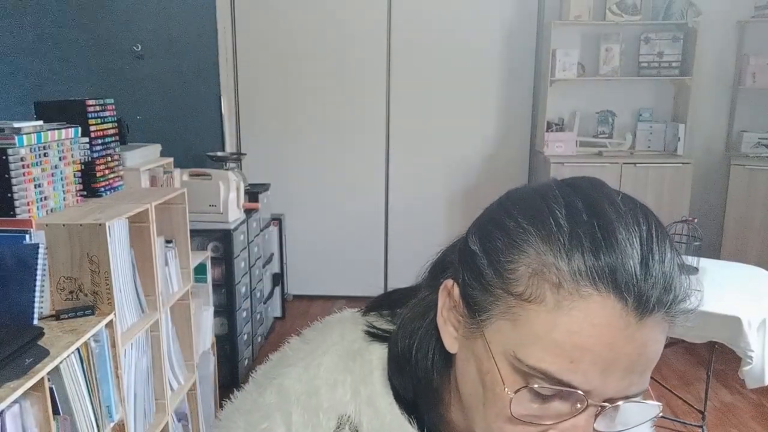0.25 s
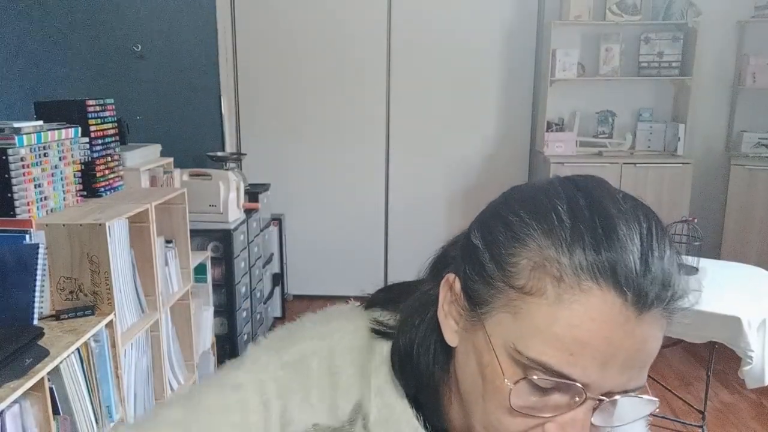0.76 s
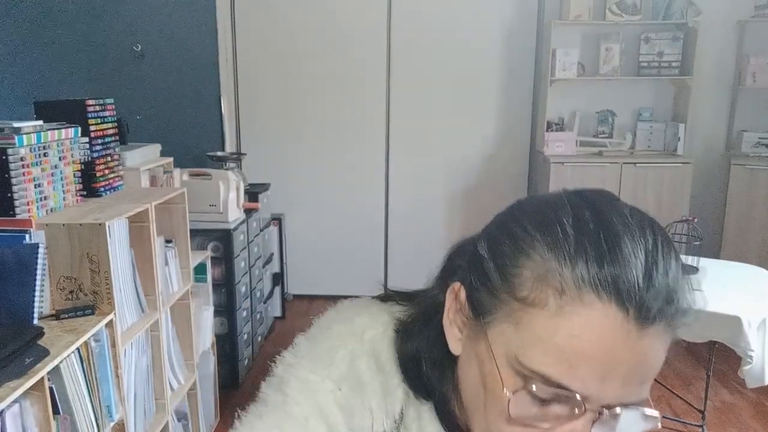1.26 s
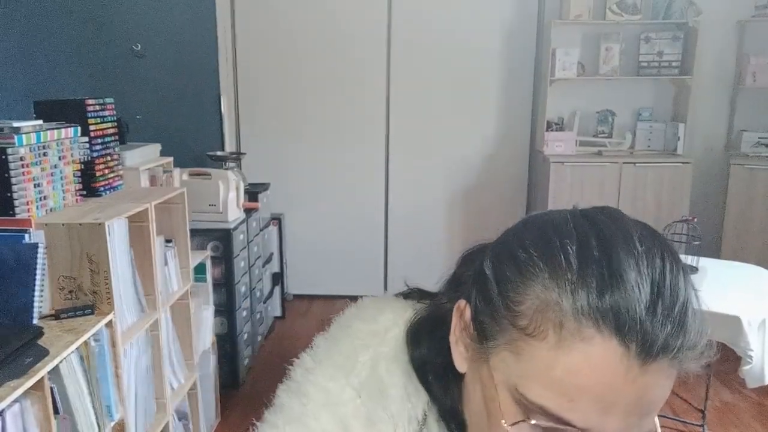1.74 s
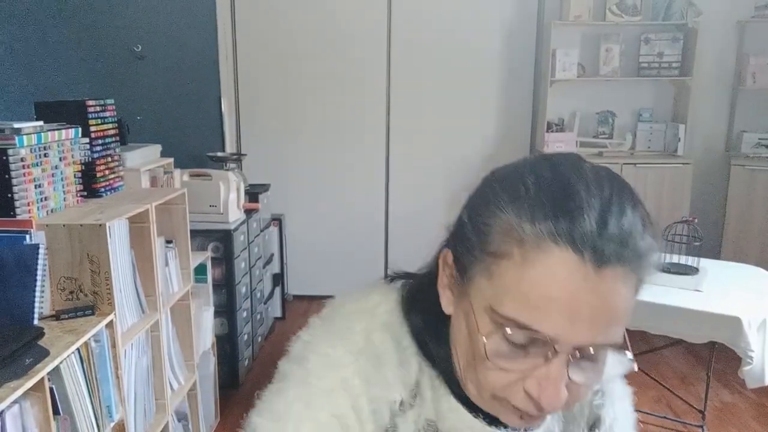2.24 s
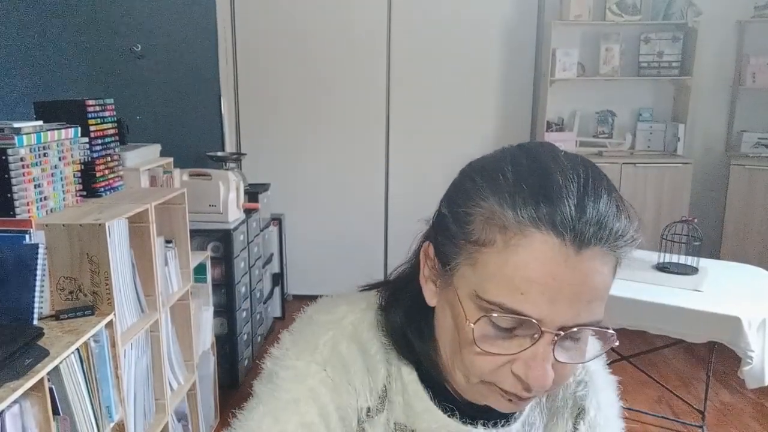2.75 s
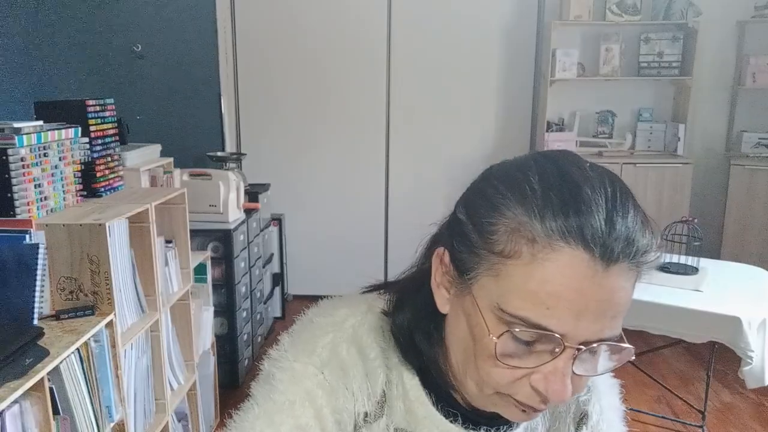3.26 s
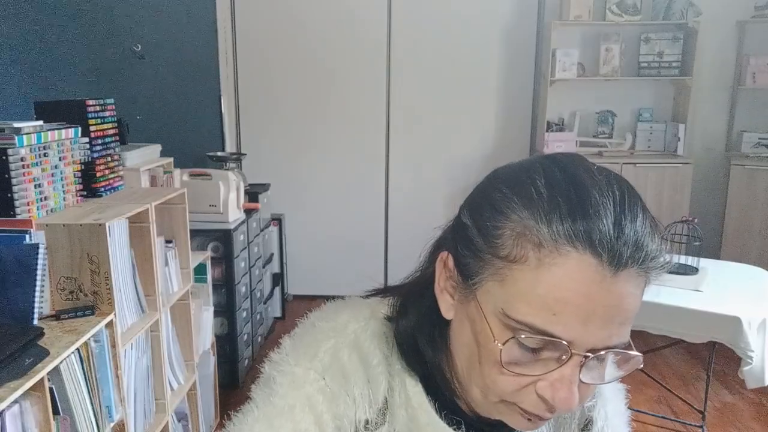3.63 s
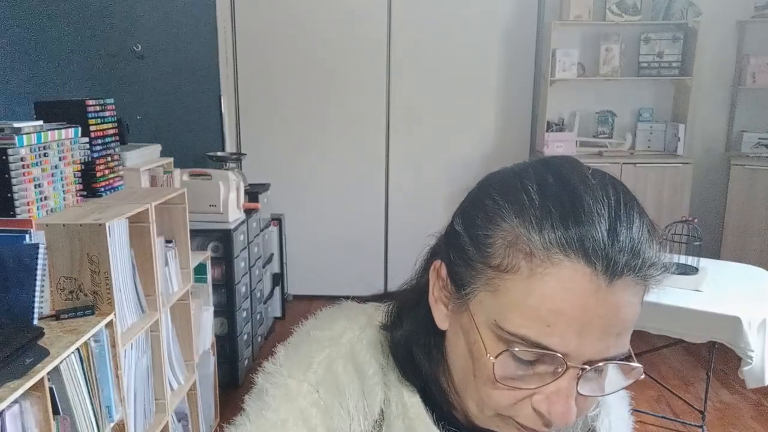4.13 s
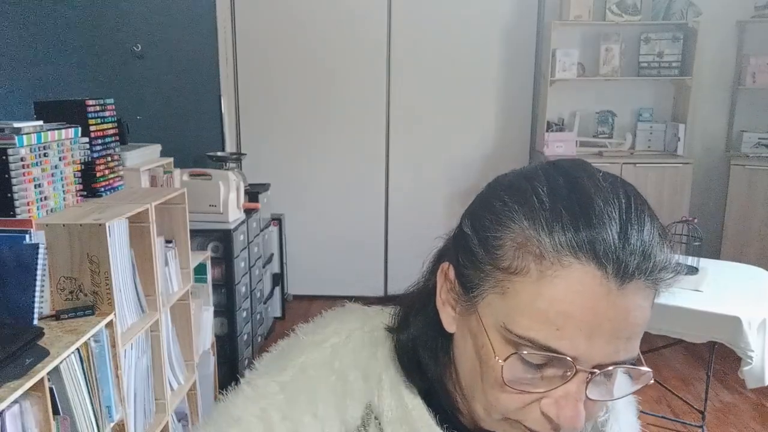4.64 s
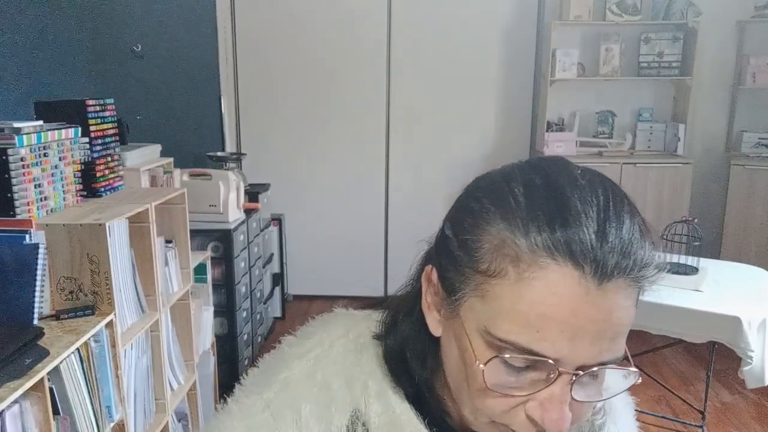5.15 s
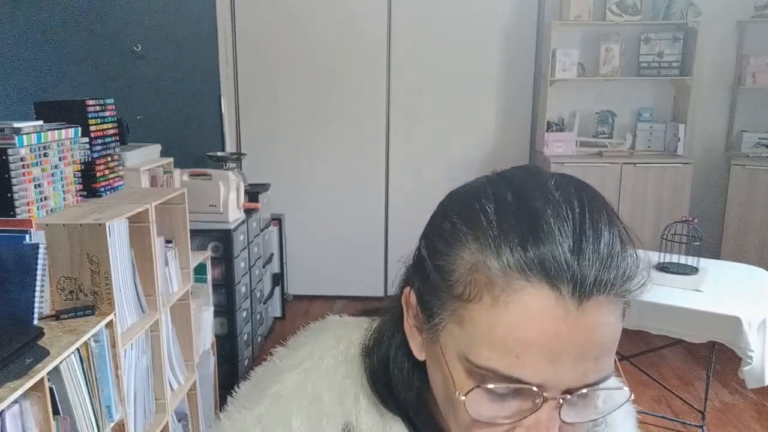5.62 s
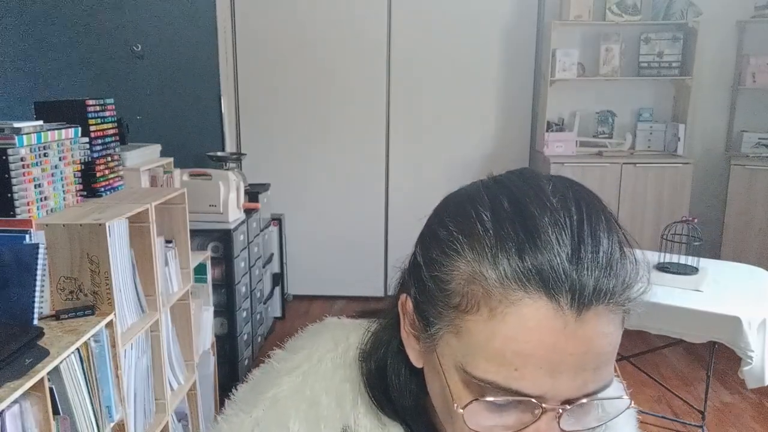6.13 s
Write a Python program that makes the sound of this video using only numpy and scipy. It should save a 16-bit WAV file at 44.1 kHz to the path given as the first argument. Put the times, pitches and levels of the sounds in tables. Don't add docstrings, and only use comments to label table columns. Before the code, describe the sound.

A hand punch ticks lightly into place, clacks and snaps hard through card, springs back with a clunk, then card rustles quietly on a table.

```python
import sys
import numpy as np
from scipy import signal
from scipy.fft import rfft, irfft
from scipy.io import wavfile
from scipy.ndimage import uniform_filter1d

SR = 44100
rng = np.random.default_rng(int(sys.argv[2]) if len(sys.argv) > 2 else 0)


def int16_out(signal):
    q = np.round(np.clip(np.atleast_2d(signal).T, -1, 1) * 32767)
    wavfile.write(sys.argv[1], SR, q.astype(np.int16))


def gain_from_decibels(decibels):
    exponent = np.asarray(decibels, float) / 20
    return 10 ** exponent


N = 281358

# frequency in Hz, level in dB, t60 in seconds.
TABLE_MODES = [(66, -5, 0.14), (100.4, 5, .35), (142.3, 0.5, 0.22), (166.1, 0, .3), (208.7, -1.5, 0.28),
               (245.7, 6.5, 0.15), (271.2, 0.5, .25), (319.8, -2, .2), (403, -8, .2), (495, -8, .2),
               (558, -14.5, 0.37), (619, -12, .12), (688, -11.5, .15), (840, -18.5, 0.23)]


def band(x, hz, width_hz):
    return signal.lfilter(*signal.iirpeak(hz, hz / width_hz, fs=SR), x)


def between(x, lo_hz, hi_hz):
    sos = signal.butter(2, [lo_hz, hi_hz], "band", fs=SR, output="sos")
    y = signal.sosfilt(sos, x)
    return y / np.std(y)


def walk(rate_hz):
    hold = int(SR / rate_hz)
    steps = np.repeat(rng.standard_normal(N // hold + 1), hold)
    return uniform_filter1d(steps, hold)[:N]


def pair(size, alike):
    mid, side = rng.standard_normal((2, size))
    same = 0.5 * min(alike, 1) / (1 + (np.fft.rfftfreq(size, 1 / SR) / 456) ** 2)
    mid = irfft(rfft(mid) * np.sqrt(0.5 + same), size)
    side = irfft(rfft(side) * np.sqrt(0.5 - same), size)
    return np.array([mid + side, mid - side])


def decay(t, t60_s):
    return np.exp(-np.log(1000) * t / t60_s)


def ring(modes, near_hz, focus_db, scatter_db):
    t = np.arange(SR // 2) / SR
    hz, db, t60_s = np.transpose(modes)[:, :, None]
    db = db - focus_db * np.abs(np.log2(hz / near_hz)) + scatter_db[:len(modes), None]
    y = np.sum(gain_from_decibels(db) * np.sin(2 * np.pi * hz * t) * decay(t, t60_s), axis=0)
    return y / np.max(np.abs(y))


def hum():
    # frequency in Hz, density in dB per Hz.
    hum_spectrum = [(15, -75.5), (25, -38), (53, -20.5), (124, 1), (207, -4), (279, -14.5), (303, -9),
                    (347, -14), (946, -41), (1140, -34.5), (2450, -30.5), (2800, -38), (3040, -33.5),
                    (14600, -40.5), (16300, -56.5)]
    hz, db = np.transpose(hum_spectrum)
    f = np.fft.rfftfreq(N, 1 / SR)
    shaped = rfft(pair(N, 0.71)) * gain_from_decibels(np.interp(np.log(f + 1), np.log(hz), db))
    low = irfft(shaped * (f < 450), N)
    high = irfft(shaped * (f >= 450), N)
    return (low * gain_from_decibels(1.4 * walk(14)) + high) * gain_from_decibels(-65) / np.std(low + high)


def room(left, right, spread):
    # band centre in Hz, t60 in seconds, wet level in dB.
    room_bands = [(148.3, .45, 4), (484, 0.48, 5), (1620, 0.46, 2), (4000, 0.46, 4), (8330, 0.33, 0.5)]
    t = np.arange(int(0.7 * SR)) / SR
    tail, noise = 0, pair(len(t), 0.98)
    for hz, t60_s, db in room_bands:
        part = between(noise, hz / 1.8, min(hz * 1.75, 0.45 * SR)) * decay(t, t60_s)
        tail = tail + gain_from_decibels(db) * part * np.sqrt(hz / (t60_s * SR * SR) * 30)
    tail = tail * np.clip((t - 0.003) / 0.003, 0, 1)
    direct = np.array([left, np.roll(right, 2)])
    return direct + signal.fftconvolve(spread[None], tail, axes=1)[:, :N]


def microphone(x):
    x = x + (gain_from_decibels(11) - 1) * band(x, 9600, 2440)
    return signal.sosfilt(signal.butter(2, [55.6, 13340], "band", fs=SR, output="sos"), x)


def card():
    # time in seconds, hiss, scrape, drag and table rumble levels in dB.
    slides = [
        [(0.0, -88, -94, -92, -71), (0.076, -83, -90, -82, -73), (0.236, -79, -90, -97, -69),
         (0.276, -72, -76, -83, -82), (0.31, -62, -67.5, -85, -71), (0.364, -67, -67, -81, -80),
         (0.416, -55, -64, -77, -72), (0.426, -50, -64, -70, -64), (0.45, -64, -62, -76, -70.5),
         (0.49, -59, -71, -81, -68), (0.508, -64, -69, -96, -77), (0.514, -58, -60, -90, -77),
         (0.524, -66, -67, -87, -74), (0.638, -87, -87, -90, -72.5), (1.028, -83, -95, -93, -75.5),
         (1.078, -88, -96, -93, -76), (1.102, -78, -96, -83, -65), (1.2, -85, -66, -77, -77)],
        [(1.31, -71, -65, -66, -55), (1.342, -64.5, -64.5, -69, -58), (1.418, -75, -77, -77, -68),
         (1.432, -64, -59, -77, -60), (1.47, -64, -73.5, -82, -64)],
        [(1.6, -67.5, -71, -69, -52), (1.632, -65.5, -68, -77, -55.5), (1.678, -56, -64, -71, -58),
         (1.688, -63, -65.5, -66, -67), (1.7, -54, -68, -76, -50.5)],
        [(2.0, -85, -82.5, -72, -58), (2.182, -90, -102, -82, -72), (2.22, -85, -93, -72, -64),
         (2.234, -66, -74, -77, -54), (2.26, -85, -70, -74, -59.5), (2.294, -50, -55.5, -79, -54),
         (2.33, -62, -51.5, -71, -53.5)],
        [(2.54, -72, -65, -74, -57), (2.62, -70, -69.5, -93, -69.5), (2.638, -69, -62.5, -67.5, -57.5),
         (2.714, -67, -64.5, -95, -63.5), (2.756, -65, -65, -75, -69), (2.838, -64, -62.5, -64, -54),
         (2.932, -82, -75, -82, -77), (2.948, -86, -85, -66, -65), (2.97, -84, -72, -75, -59.5)],
        [(3.03, -85, -79, -87, -66), (3.128, -91, -96, -83, -68.5), (3.168, -73, -70, -90, -64),
         (3.25, -77, -73, -77, -73), (3.354, -54.5, -58, -79, -64), (3.364, -59, -55.5, -77, -56.5),
         (3.428, -74, -74, -92, -68.5), (3.572, -76, -76, -82, -76), (3.582, -68, -71.5, -73, -67),
         (3.63, -78, -88, -93, -72), (3.66, -81, -74, -80, -72), (3.7, -98, -97, -86, -73.5),
         (4.044, -96.5, -102, -91.5, -76.5), (4.074, -82, -96, -83, -63), (4.094, -71, -75.5, -91, -76.5),
         (4.104, -72, -65.5, -72, -81), (4.134, -84, -84, -87, -61), (4.202, -73, -77, -87, -89),
         (4.228, -88, -99, -99, -72.5), (4.282, -74, -72, -84, -74), (4.316, -94, -98, -91, -73.5),
         (4.612, -79, -72, -85, -68.5), (4.67, -86, -86, -58, -64), (4.7, -87, -74, -72, -77),
         (4.8, -109, -94, -81, -67)],
        [(4.84, -63, -81, -85, -68), (4.912, -74, -71, -96, -70.5), (5.002, -82, -82, -82, -73.5),
         (5.074, -63.5, -68, -90, -75), (5.092, -74, -78, -83, -72), (5.152, -68, -69, -90, -73),
         (5.204, -80, -79, -82, -76.5), (5.26, -82, -82, -94, -78), (5.286, -68.5, -70.5, -85, -76.5),
         (5.37, -85, -77, -95, -72.5), (5.542, -69.5, -67.5, -90, -70), (5.568, -72, -66, -76, -78),
         (5.672, -83, -79, -91, -67.5), (5.736, -83, -72.5, -65.5, -69), (5.946, -80, -79.5, -85, -73.5),
         (6.018, -79, -73, -91, -72), (6.058, -90.5, -76.5, -97, -73.5), (6.144, -65, -65.5, -74, -74),
         (6.212, -89, -81, -84, -75), (6.314, -83, -73.5, -97, -71.5), (6.354, -91, -92, -84, -72),
         (6.38, -87, -95, -85, -70.5)],
    ]
    # frequency in Hz, width in Hz, level in dB.
    scrape_modes = [(1730, 230, -11), (2200, 320, 8), (2540, 2800, 1.5), (4200, 1500, -11)]
    rows = []
    for span in slides:
        before, after = span[0][0] - 0.02, span[-1][0] + 0.02
        rows += [[before] + 4 * [-100], *span, [after] + 4 * [-100]]
    s, *columns = np.transpose(rows)
    hiss_db, scrape_db, drag_db, rumble_db = (np.interp(np.arange(N) / SR, s, c) for c in columns)

    slip = pair(N, 0.9) * gain_from_decibels(1.2 * walk(40) + 2.2 * walk(400))
    scrape = sum(gain_from_decibels(db) * band(slip, hz, width_hz) for hz, width_hz, db in scrape_modes)
    shake = pair(N, 0.9) * gain_from_decibels(3 * walk(25))
    rumble = sum(gain_from_decibels(db) * band(shake, hz, 12 / t60_s) for hz, db, t60_s in TABLE_MODES)

    out = gain_from_decibels(hiss_db - 8.5) * between(slip, 5500, 15000)
    out = out + gain_from_decibels(scrape_db) * scrape / np.std(scrape)
    out = out + gain_from_decibels(drag_db) * between(slip, 450, 1740)
    return out + gain_from_decibels(rumble_db) * rumble / np.std(rumble)


def thump(db, hz):
    push = signal.windows.hann(int(0.0012 * SR))
    modes = ring(TABLE_MODES, hz, 4.4, 3 * rng.standard_normal(16))
    return -gain_from_decibels(db) * signal.fftconvolve(modes, push / push.sum())[:SR // 2]


def crack(db, hz, edge_db, chatter_ms, wall_db):
    # frequency in Hz, level in dB, t60 in seconds.
    punch_modes = [(1060, 2, 0.026), (1132, 6, 0.1), (1360, -15, 0.035), (1630, 6, 0.03), (1786, 1.5, 0.1),
                   (2110, 17.5, 0.022), (2300, 14, .05), (3340, 4, 0.018), (4820, 0, 0.025),
                   (5900, -3.5, 0.017)]
    t = np.arange(SR // 2) / SR
    fade = np.exp(-t / np.clip(chatter_ms / 1000, 0.0003, 0.008))
    mid, side = rng.standard_normal((2, len(t))) * fade
    walls = (t == 0) * np.sqrt(np.sum(mid ** 2)) * gain_from_decibels(wall_db)
    blow = np.array([mid + 0.47 * side, mid - 0.53 * side, walls])

    bare = band(band(blow, hz, 1.8 * hz), hz, 1.8 * hz)
    body = ring(punch_modes, hz, 16, 1.3 * rng.standard_normal(16))
    frame = signal.fftconvolve(blow[:, :SR // 20], body[None], axes=1)[:, :len(t)]
    edge = band(blow, 6130, 7000)

    out = 1.15 * bare / np.ptp(bare[0]) + 0.39 * frame / np.ptp(frame[0])
    return gain_from_decibels(db) * (out + 1.45 * gain_from_decibels(edge_db) * edge / np.ptp(edge[0]))


def place(rows):
    out = np.zeros((3, N + SR))
    for s, sound in rows:
        start = int(s * SR)
        out[:, start:start + SR // 2] += sound
    return out[:, :N]


def contacts():
    # start in seconds, crack peak in dB, body ring in Hz, edge minus crack in dB,
    # chatter in ms, share thrown to the walls in dB.
    hits = [(0.42, -46.5, 4630, -2, 2, 4), (0.425, -56, 2170, -5, 2.2, -1.5),
            (0.512, -51, 2240, -5, 1.74, -10), (1.115, -61, 1940, -11, 2.2, 2),
            (1.152, -54, 1780, -18, 2.2, -1.5), (1.185, -61, 1660, 3, 2.2, 4),
            (1.22, -37, 1060, -9, 2.1, 5), (1.28, -33, 1170, -24, 3.4, -4),
            (1.332, -43.5, 2300, -12, 2.7, 2), (1.432, -53, 1170, -5, 2.2, -5.5),
            (1.478, -56, 2094, 5, 2.2, 5), (1.486, -31.5, 2200, -26, 4.3, 6.5),
            (1.503, -26, 960, -2.5, 1.4, 0), (1.508, -25, 1916, -4, 1.8, -1.5),
            (1.672, -42, 4670, -6, 3, 2), (1.714, -26, 1950, -3, 3.6, -2.5),
            (1.72, -30.5, 2070, 1, 2.2, -6), (1.758, -12, 1650, -3, 3, -1),
            (1.767, -13, 2200, -31.5, 3.6, -1.5), (2.232, -53, 1040, -10, 2.2, 3),
            (2.264, -39, 1110, -15, 2.2, -5), (2.286, -42.5, 970, 3.5, 1.9, 1),
            (2.339, -30, 1680, -20, 3.8, 2), (2.367, -27, 1720, -8, 3.6, -2),
            (2.373, -16.5, 1630, -3.5, 2.7, -0.5), (2.99, -35, 3080, -15, 1.5, -13),
            (3.003, -39, 2030, -12, 1.8, 0.5), (3.491, -51.5, 1690, -12, 2.3, -6.5),
            (3.584, -58, 2090, -15, 2.2, -3.5), (4.103, -46.5, 1440, -14.5, 2, -1.5),
            (4.193, -53.5, 1420, -17, 2.4, 2), (4.275, -56, 1430, -13, 3.2, 5),
            (4.645, -55, 1560, -20, 2.2, 4), (4.662, -47, 1260, -21, 2.2, 8),
            (4.824, -46, 5900, -26, 2.8, -0.5), (5.728, -53, 1280, -15, 2.4, -1)]
    # start in seconds, peak in dB, favoured pitch in Hz.
    thumps = [(0.514, -48.5, 112), (1.094, -44, 152), (1.111, -42.5, 104.6), (1.23, -46.5, 82),
              (1.23, -42.5, 98), (1.278, -39.5, 248), (1.503, -24.5, 253), (1.713, -25.5, 177),
              (1.756, -15, 203), (1.767, -21, 268), (2.082, -41, 243), (2.239, -38.5, 99.6),
              (2.276, -37, 99.6), (2.338, -37.5, 108), (2.367, -25, 215), (2.373, -28, 102),
              (2.699, -46, 299), (2.988, -53.5, 99.6), (3.003, -48.5, 192), (4.646, -56, 277)]
    cracks = [(s, crack(*row)) for s, *row in hits]
    return place(cracks + [(s, thump(*row)) for s, *row in thumps])


def scene():
    return microphone(room(*contacts()) + card()) + hum()


def low_pass(x):
    return signal.sosfilt(signal.butter(12, 16470, fs=SR, output="sos"), x)


def record(dry):
    return low_pass(dry)


dry = scene()
out = record(dry)
int16_out(out)
```